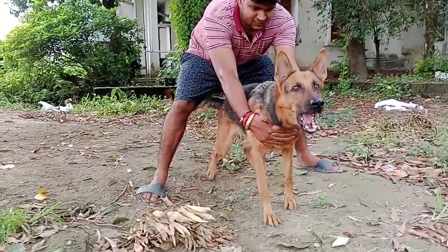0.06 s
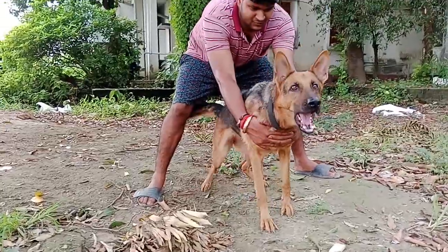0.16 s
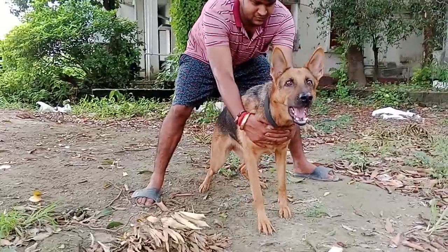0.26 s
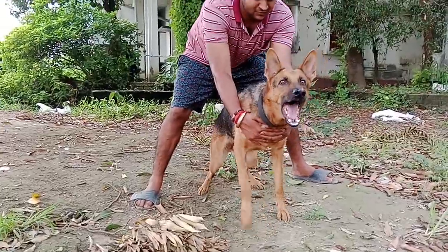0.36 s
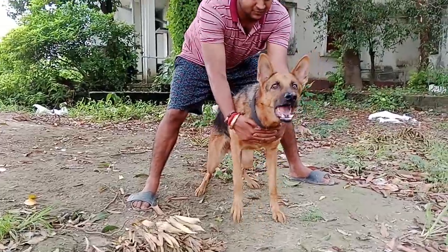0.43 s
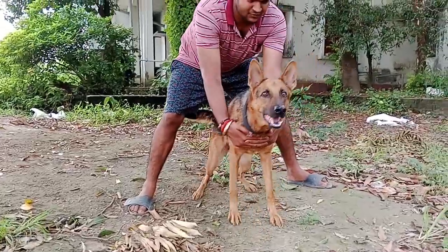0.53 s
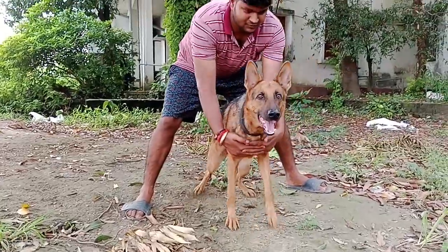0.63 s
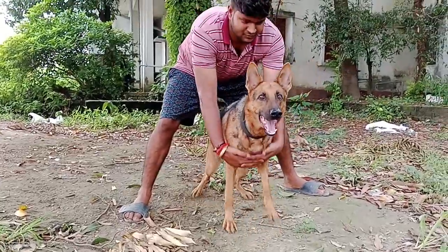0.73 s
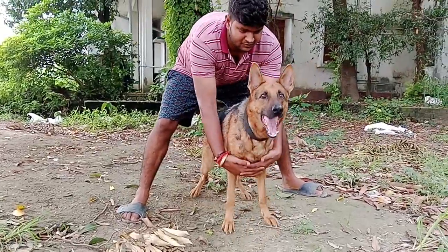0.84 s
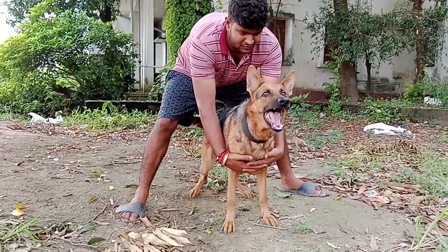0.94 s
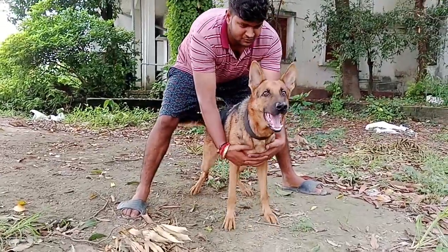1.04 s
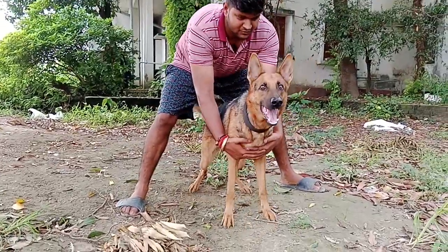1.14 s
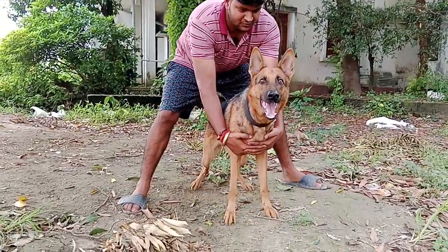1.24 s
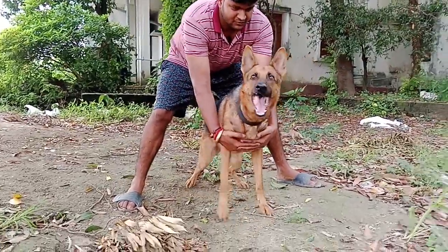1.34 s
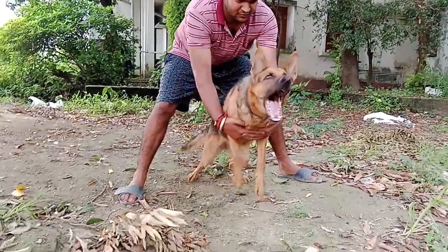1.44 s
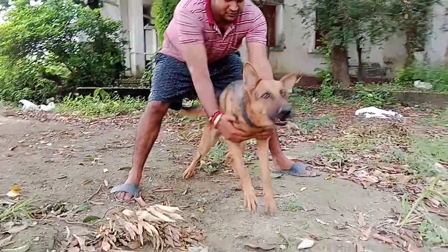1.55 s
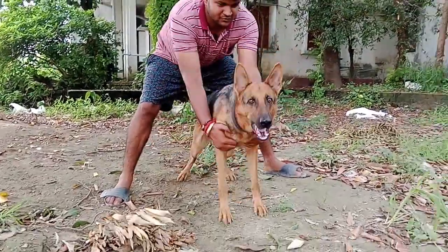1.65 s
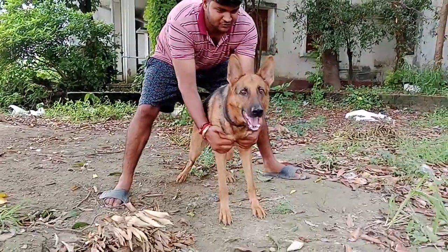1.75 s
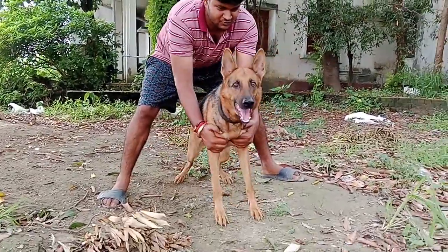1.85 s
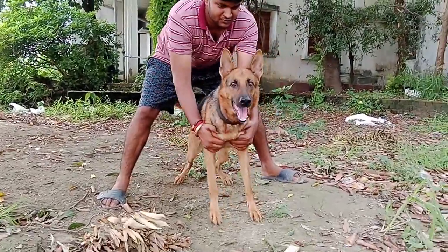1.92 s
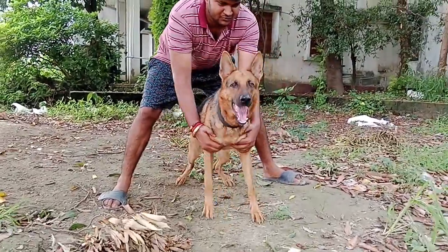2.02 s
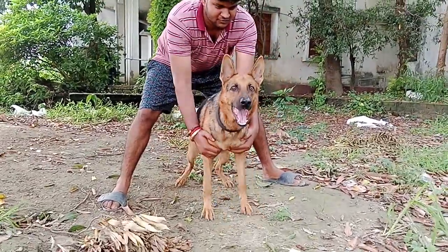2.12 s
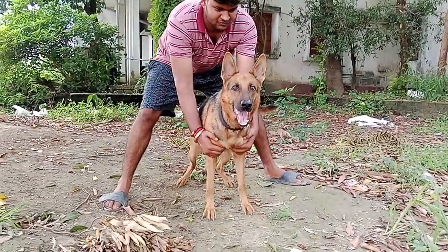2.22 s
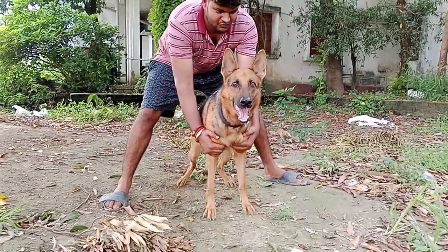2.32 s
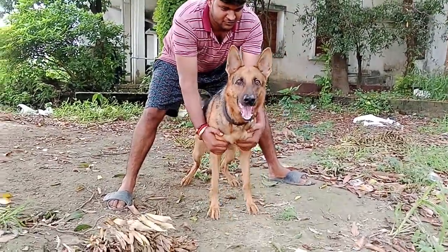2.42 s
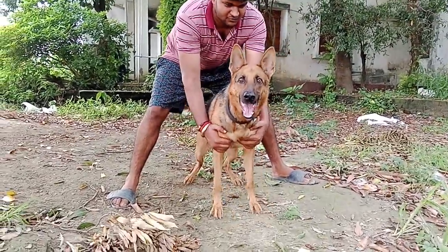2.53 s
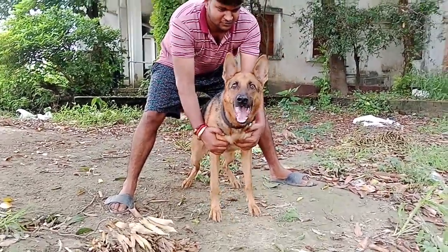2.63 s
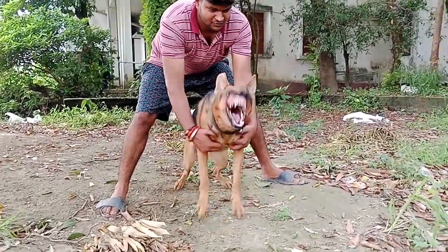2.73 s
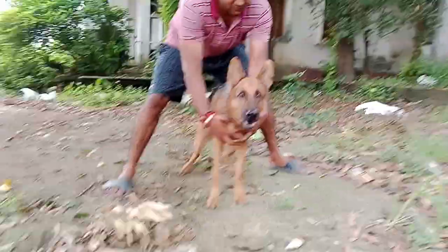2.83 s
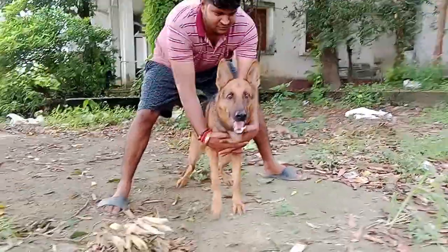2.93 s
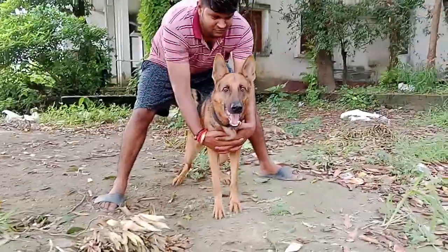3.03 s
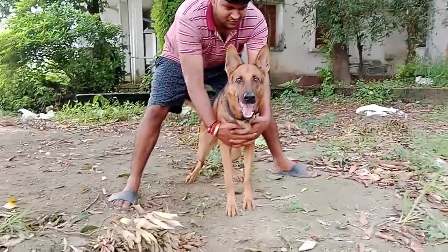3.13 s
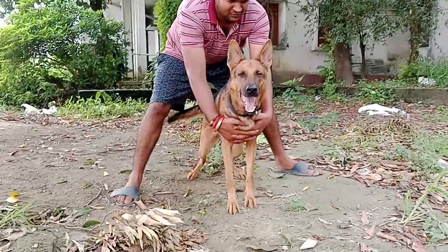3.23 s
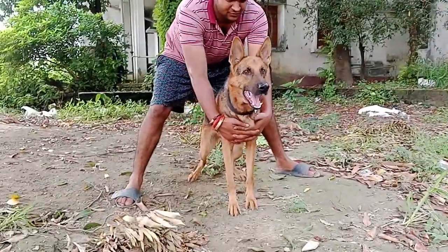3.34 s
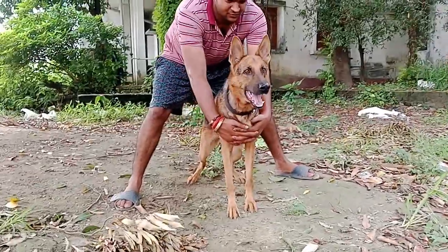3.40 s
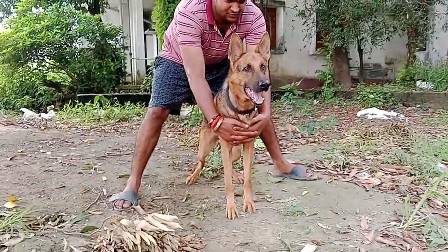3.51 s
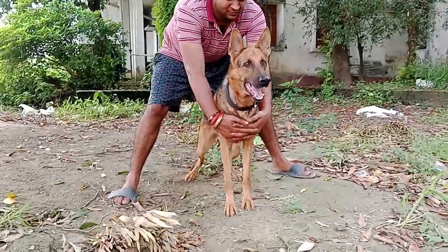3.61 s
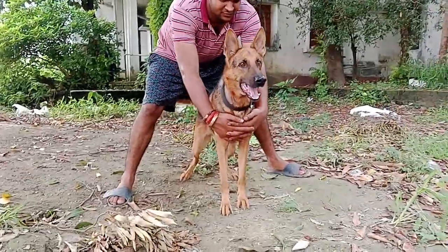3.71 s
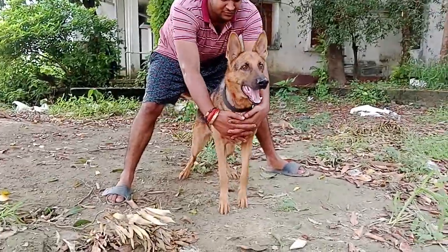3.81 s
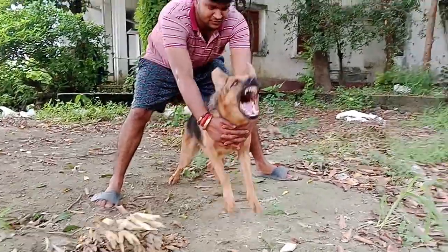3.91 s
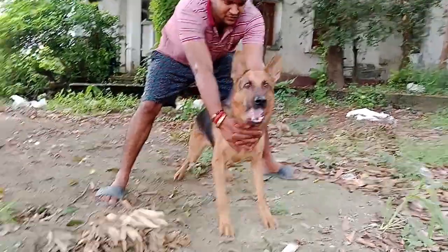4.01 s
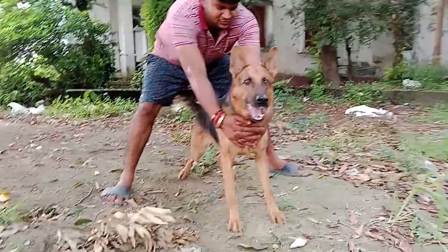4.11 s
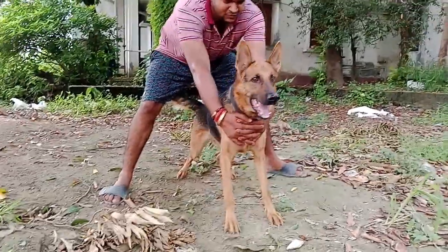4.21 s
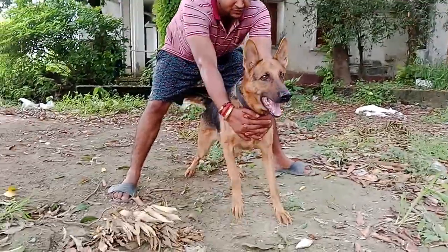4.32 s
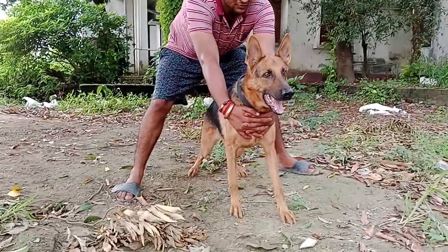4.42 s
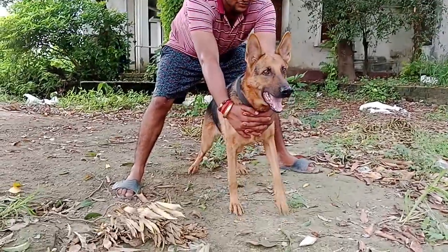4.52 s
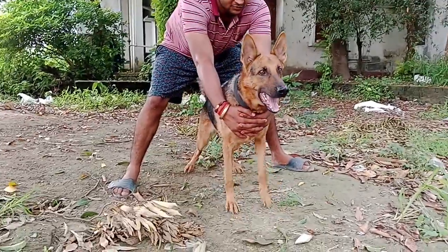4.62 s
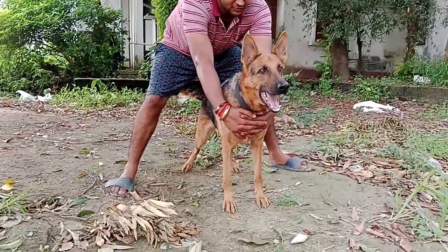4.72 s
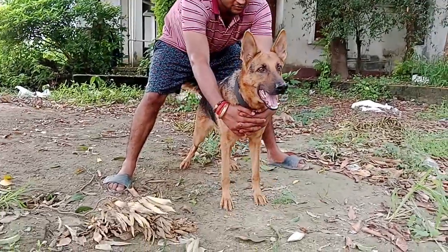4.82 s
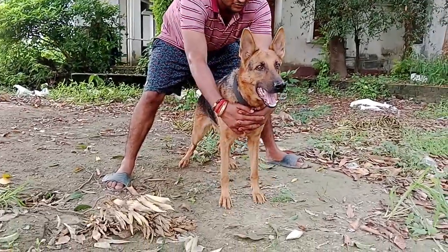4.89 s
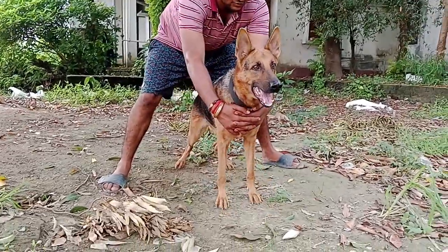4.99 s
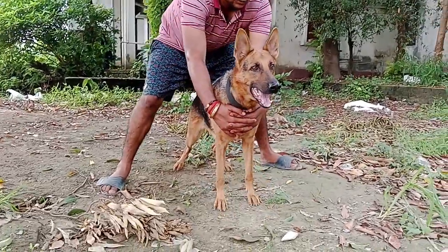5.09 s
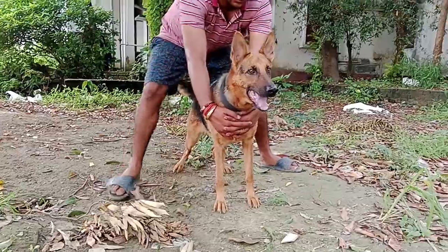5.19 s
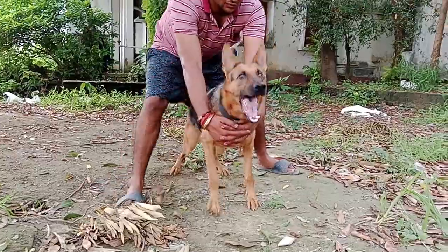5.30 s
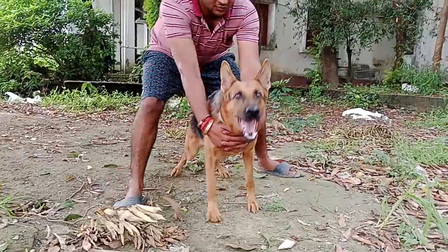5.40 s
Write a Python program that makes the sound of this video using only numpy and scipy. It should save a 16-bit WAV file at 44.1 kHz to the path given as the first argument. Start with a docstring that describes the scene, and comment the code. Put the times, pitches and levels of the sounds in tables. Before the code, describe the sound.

A large dog in an open yard near a wall, picked up fairly close in one channel. At 0 s the falling tail of a bark is cut in, turning at once into a tense, wavering whine that drops lower around 0.2 s, rises again and ends at 0.5 s with an airy gasp and thin nasal whistle. Eight short, high, tonal barks follow, each about a tenth of a second, at roughly 0.9, 1.5, 2.1, 2.7, 3.3, 3.9, 4.7 and 5.4 s. The one at 2.1 is lower and weaker; the last has no gasp. After the others comes a quick breathy gasp, usually with a small rising squeak, abruptly cut. A diffuse wall echo rings after each call, its level dropping suddenly and mostly sinking before the next. Faint panting and shuffling, around 1.9, 3.1, 4.4 and 5.3 s, and soft low thumps lie under a very quiet, noise-reduced background.

```python
"""In a yard near a wall, a large dog, held back, ends a bark, whines and then gives eight short high barks.
The voice stacks vocal-fold harmonics over rasp; a gasp of filtered noise follows the whine and all but
the last bark, mostly with a thin nasal whistle made of gliding sines. Wall echoes and random taps make
the yard ring. After each of these calls the level swells, drops quickly and mostly sinks until the next
call. Faint panting, low thumps and a noise floor lie below."""
import sys
import numpy as np
from scipy import signal
from scipy.fft import rfft, irfft, next_fast_len
from scipy.io import wavfile
from scipy.ndimage import uniform_filter1d, minimum_filter1d

SR = 44100
rng = np.random.default_rng(int(sys.argv[2]) if len(sys.argv) > 2 else 0)


def inscribe(sig):
    """Save sig as 16-bit PCM at rate SR to the path in sys.argv[1].

    A 1-D sig is mono; a 2-D sig holds one channel per row.
    Samples are clipped to [-1, 1] before scaling.
    """
    pcm = np.round(np.clip(np.atleast_2d(sig).T, -1, 1) * 32767)
    wavfile.write(sys.argv[1], SR, pcm.astype(np.int16))


N = 240413  # length in samples

# Colour of the noise floor. Each row: frequency in Hz, relative density in dB per Hz.
FLOOR_COLOUR = [(20, -32.5), (100, -15.5), (180, -4), (450, -15), (1000, -15.5), (3000, -24), (7000, -34),
                (15000, -39.5)]
FLOOR_DB = -77  # rms, ahead of the suppressor
# Soft low thumps. Each row: peak in seconds, rise in seconds, fall in seconds, level in dB, pitch in Hz.
THUMPS = [(.6, 0.048, 0.047, -44, 102), (1.165, 0.099, 0.037, -56, 130), (1.737, 0.04, 0.018, -49.5, 134),
          (2.231, 0.079, 0.035, -60.5, 155.3), (2.289, 0.044, 0.054, -53, 128.6),
          (2.912, 0.039, 0.042, -52, 142.1), (3.466, .07, 0.06, -49.5, 135), (4.162, 0.071, .03, -67, 156),
          (4.314, 0.078, 0.06, -75.5, 119), (4.97, 0.05, 0.07, -60, 133)]
THUMP_ENDS_DB, PANT_ENDS_DB = -27.5, -24.5  # start and end, relative to the peak
# Faint panting and shuffling. Each row: start in seconds, peak in seconds, end in seconds, level in dB.
PANTS = [(1.812, 1.855, 2.53, -58), (2.993, 3.059, 3.24, -57), (4.23, 4.398, 5.04, -59),
         (5.242, 5.28, 5.32, -59), (5.307, 5.335, 5.44, -45)]
# Colour of the panting. Each row: frequency in Hz, relative density in dB per Hz.
PANT_COLOUR = [(1200, -33), (2300, 10), (2750, 3.5), (3300, 9.5), (4200, -13.5), (6500, -9.5), (10000, -21.0)]
# Decay of the yard. Each row: frequency in Hz, time to fall by 60 dB in seconds.
YARD_DECAY = [(300, 0.78), (800, 0.76), (1600, 0.88), (3000, 0.64), (4500, 1), (12000, 1)]
# Single wall echoes. Each row: delay in seconds, level in dB.
WALL_ECHOES = [(.045, -29), (.088, -25.5), (.14, -26.5), (.26, -35)]
# Microphone tone on the dog and the yard. Each row: frequency in Hz, gain in dB.
MIC_TONE = [(100, -10), (250, -14), (400, -1), (3400, 0), (4000, -5), (4800, -14.5), (5400, -10.5),
            (6400, -10), (9000, -10), (15000, -9.5)]
# Level moves between one call and the next. Each row: swell start in seconds, step in seconds,
# return in seconds.
STEP_TIMES = [(.52, .618, .908), (1.015, 1.113, 1.496), (1.65, 1.742, 2.06), (2.16, 2.215, 2.712),
              (2.825, 2.961, 3.305), (3.4, 3.482, 3.912), (4.025, 4.161, 4.67), (4.787, 4.86, 5.345)]
# Sizes of those moves. Each row: swell in dB, step in dB, sink (negative falls) in dB per second.
STEP_LEVELS = [(3, -5.5, -5.5), (2.5, -3.5, -8.5), (5, -4, 10), (3, -2.5, -38.5), (4, -4.5, -4),
               (3, -8.5, -29), (7.5, -5, -0.5), (3, -6.5, -23)]
# Gasps, one in each swell. Each row: peak in seconds, air level in dB, hiss level in dB,
# start relative to the peak in dB, end relative to the peak in dB.
GASPS = [(.566, -30.5, -46, -15.5, -7), (1.095, -39, -50, -14, -5.5), (1.708, -30, -49.5, -16.5, -6.5),
         (2.2, -32, -44, -14, -7), (2.882, -46, -60.5, -9, -4.5), (3.427, -37.5, -50.5, -5.5, -16),
         (4.15, -39, -55.5, -8.5, -4.5), (4.835, -37.5, -45.5, -2.5, -1.5)]
GASP_OVERHANG_S = .006  # a gasp ends this long after its level step
# Rush of air in a gasp. Each row: frequency in Hz, relative density in dB per Hz.
AIR_COLOUR = [(250, -58), (500, -15), (800, -6.5), (1100, -4.5), (1600, -1.5), (2300, -9), (3000, -15.5),
              (3700, -18), (5000, -31.5), (8000, -52)]
# Hiss in a gasp. Each row: frequency in Hz, relative density in dB per Hz.
HISS_COLOUR = [(3000, -25), (5500, 1.5), (8000, 0.5), (11000, -10.5), (15500, -12)]
# Nasal whistles. Each row: start in seconds, length in seconds, start pitch in Hz, end pitch in Hz,
# lateness of the glide as an exponent, level in dB, overtones relative to the fundamental in dB.
WHISTLES = [(0.517, 0.098, 2982, 3170, 1.5, -29.5, -16), (1.014, .075, 3046, 3830, 7.2, -32, -12.5),
            (2.171, 0.046, 3153, 4700, 5, -28, -5), (2.83, 0.06, 2935, 3940, 2.57, -45, -3.5),
            (3.4, .042, 3030, 4170, 2.9, -34, -2.5), (4.031, 0.038, 2950, 3300, 1.8, -37.5, -9.5),
            (4.771, 0.029, 4010, 3036, 0.89, -39, -4.5), (4.795, .1, 3040, 4520, 2.1, -34, 0.5)]
WHISTLE_PEAK = .6  # loudest at this share of the length
WHISTLE_START_DB, WHISTLE_END_DB = -9, -17  # relative to the peak
# Vocal folds, one curve a syllable: the falling tail of an earlier bark, the whine in two pieces, then
# the barks. Each row: time in seconds, pitch in Hz, level in dB, brightness in dB per harmonic
# (up to the third), hoarseness in dB.
VOICE = [
    [(0.0, 713.7, -16, -6, -24), (0.02, 635.9, -29, -4.5, -5.5), (0.04, 511.8, -39.5, -3.5, -1.5)],
    [(0.04, 769.2, -26.5, -1.5, -23.5), (0.076, 788, -28, -2, -12), (0.092, 758.1, -19.5, 2.5, -8),
     (0.111, 773, -16, 1, -14.5), (0.135, 805.3, -14, 5, -19.5), (0.159, 793.8, -15.5, 0.5, -21),
     (0.183, 810.9, -11.5, 0.5, -13.5)],
    [(0.187, 544.8, -18, 2, -8.5), (0.205, 547.8, -18, 1.5, -23), (0.229, 522.6, -15.5, 4.5, -26.5),
     (0.255, 477.2, -25, 6.5, -15.5), (0.283, 500.3, -22, 5.5, -26.5), (0.313, 486.2, -24.5, 4.5, -24),
     (0.329, 501.6, -20.5, 7.5, -24), (0.342, 479, -21, 3.5, -8.5), (0.352, 504, -23, 2.5, -18),
     (0.365, 560.6, -14.5, 5.5, -22), (0.391, 626.4, -18, 0, -27), (0.41, 626.5, -15, 1, -30.5),
     (0.439, 617.4, -19, 0.5, -28.5), (0.465, 584.7, -21, -1.5, -23.5), (0.5, 522.2, -20.5, 3, -18.5),
     (0.52, 495.1, -37, -0.5, -16)],
    [(0.915, 536.5, -66, 3, -7.5), (0.923, 571.8, -31.5, 0, -2), (0.933, 641, -21, 8, -20.5),
     (0.944, 814.7, -11.5, 2.5, -34), (0.965, 877, -10.5, -2, -33), (0.988, 980, -7, -2, -29),
     (1.002, 955.3, -12.5, -1, -30.5), (1.015, 836, -36.5, 0.5, -11)],
    [(1.503, 583.2, -64, 9, 3), (1.516, 605.8, -23.5, -5, -6), (1.53, 761.8, -12.5, 5, -35.5),
     (1.543, 814.6, -14.5, -6, -28.5), (1.57, 765.3, -10, -3.5, -29.5), (1.582, 770, -10, -2, -27.5),
     (1.59, 849, -20, -3.5, -5.5), (1.604, 834.6, -18.5, -3, -14), (1.62, 749.6, -17.5, -4, -31),
     (1.638, 668.6, -22, -4, -19), (1.655, 686, -30.5, -5.5, -3)],
    [(2.068, 504.7, -61.5, -3, -8.5), (2.075, 557.3, -30, 1, -2), (2.085, 557.6, -22.5, 0, -2),
     (2.096, 613.3, -19.5, 6, -14.5), (2.11, 668.3, -27, 0, -31), (2.121, 800, -12, -0.5, -19.5),
     (2.134, 755.3, -15, 3, -40.5), (2.149, 646, -21, 0.5, -13), (2.162, 545, -48, -2, -5)],
    [(2.72, 640.6, -58.5, 6.5, 3), (2.729, 645.5, -20.5, 0, -9), (2.742, 801.5, -14, 0.5, -46.5),
     (2.757, 832.6, -13.5, -1.5, -29), (2.773, 789, -10.5, 0.5, -34.5), (2.79, 793.6, -10.5, 1, -30),
     (2.81, 811.8, -13, -10.5, -43.5), (2.827, 745.6, -29.5, -1, -18.5)],
    [(3.313, 544.7, -61, 2.5, -7), (3.321, 540, -36.5, -0.5, -6), (3.332, 658.6, -19.5, 4, -12),
     (3.343, 808.3, -13.5, -1, -35), (3.357, 883.3, -16.5, -4, -34.5), (3.371, 890.2, -4.5, -1.5, -30),
     (3.386, 771.5, -16.5, 2.5, -42), (3.4, 649, -43, 1.5, -2)],
    [(3.92, 570.2, -63.5, 2.5, 0.5), (3.929, 636.2, -22.5, -4.5, -19.5), (3.942, 746.7, -14.5, 6, -30),
     (3.956, 822.6, -13.5, 1.5, -46.5), (3.972, 834.5, -10.5, 0, -22), (3.99, 831.7, -7, -4.5, -32.5),
     (4.007, 797, -10, 1, -48.5), (4.025, 702, -31, 4.5, -17)],
    [(4.678, 455.5, -62.5, -2.5, -5.5), (4.686, 518.6, -37, 3, -7.5), (4.695, 500.5, -24, -0.5, -14.5),
     (4.708, 611.5, -28.5, 0.5, -10.5), (4.718, 706, -16, 4.5, -28.5), (4.73, 863.4, -8.5, 1, -29),
     (4.744, 885.3, -11.5, -3, -22), (4.758, 870.7, -6, -1, -28), (4.773, 809.6, -13, 1.5, -31),
     (4.787, 694.4, -26.5, 11.5, -17)],
    [(5.354, 647, -63, 4.5, 3), (5.362, 649.5, -21, 0, -14), (5.373, 768, -7.5, 5, -36),
     (5.387, 864, -13, -2, -26), (5.41, 872, -7, -1.5, -45.5), (5.432, 882.5, -9.5, 1.5, -35),
     (5.452, 839, -25, 1, -20)],
]
# The mouth through the calls. Each row: time in seconds, level of the higher harmonics in dB,
# level of the second harmonic in dB, opening as a factor on the throat resonances.
MOUTH = [
    [(0.0, -48.5, -32, 0.78), (0.01, -66, -33, 0.95), (0.06, -66, -34.5, 0.98), (0.104, -60, -24.5, 1.01),
     (0.142, -53, -18.5, 0.94), (0.168, -60.5, -20.5, 1.01), (0.185, -58, -23.5, 0.92)],
    [(0.187, -59.5, -28, 0.95), (0.229, -58.5, -25, 1.12), (0.259, -61, -39, 1.18),
     (0.291, -63, -28.5, 1.3), (0.309, -61.5, -32.5, 2), (0.339, -55, -26, 1.01), (0.35, -57, -28.5, 0.88)],
    [(0.352, -57.5, -27.5, 1.01), (0.364, -50, -33.5, 1.07), (0.41, -51, -18.5, 0.93),
     (0.438, -52.5, -30.5, 0.99), (0.454, -55.5, -19.5, 1.02), (0.474, -51, -26, 1.01),
     (0.52, -65.5, -33.5, 0.94)],
    [(0.915, -67, -60.5, 0.9), (0.921, -61, -42, 0.92), (0.939, -55, -15.5, 1), (0.985, -45.5, -31, 1),
     (1.005, -49.5, -22.5, 1.22), (1.015, -56.5, -49, 0.72)],
    [(1.503, -70, -62.5, 0.8), (1.513, -59, -36, 1.07), (1.531, -56, -15, 0.9), (1.571, -56, -17.5, 1.085),
     (1.639, -64.5, -42, 0.96), (1.655, -69.5, -26, 1.01)],
    [(2.068, -65, -61, 1.1), (2.074, -59.5, -26, 1.12), (2.096, -57.5, -24.5, 0.96),
     (2.106, -56, -26.5, 1.08), (2.114, -57.5, -17, 1.01), (2.13, -53.5, -11, 1.09),
     (2.162, -60.5, -40, 0.93)],
    [(2.72, -66, -48.5, 0.84), (2.734, -58.5, -17, 1.034), (2.782, -47, -17.5, 0.96),
     (2.802, -55, -18, 1.22), (2.827, -64, -40.5, 1.15)],
    [(3.313, -66, -56.5, 0.96), (3.321, -50, -35, 0.78), (3.339, -58, -18, 0.89), (3.359, -53, -32.5, 1.12),
     (3.373, -57, -16, 1.005), (3.383, -56, -13.5, 0.97), (3.4, -57, -34.5, 1.1)],
    [(3.92, -70.5, -63, 1.12), (3.924, -66, -44.5, 1.07), (3.936, -57.5, -18.5, 0.98),
     (3.95, -51.5, -17, 0.93), (3.962, -57.5, -15.5, 1.01), (3.982, -51, -20, 0.96),
     (4.006, -51.5, -15.5, 0.97), (4.025, -66.5, -34.5, 0.81)],
    [(4.678, -67.5, -64.5, 1.01), (4.684, -54.5, -35, 0.91), (4.698, -56, -33, 1.01),
     (4.708, -56, -28.5, 0.97), (4.72, -56.5, -15, 0.88), (4.732, -55, -23.5, 1.04),
     (4.772, -56, -14.5, 0.98), (4.787, -50, -31.5, 0.96)],
    [(5.354, -70, -55, 1.05), (5.36, -59, -33.5, 0.9), (5.372, -57.5, -6.5, 1.055), (5.4, -47, -26.5, 0.97),
     (5.414, -48, -18, 1.02), (5.43, -45, -21, 1.06), (5.451, -54, -27, 0.85)],
]
# How throat and mouth weigh the four lowest harmonics. Each row: frequency in Hz, weight in dB.
THROAT = [(450, 0), (600, -11.5), (800, 0.5), (950, -3), (1150, -11), (1600, -6), (2000, -12), (2350, -9),
          (2650, -23.5), (3200, -42), (3800, -23.5)]
# Tone of the harmonics from the fifth up. Each row: frequency in Hz, gain in dB.
UPPER_TONE = [(2400, 15), (3300, 2.5), (4200, -3), (4800, -9), (5400, -1), (6500, 3.5), (9000, -9),
              (12000, -11), (16000, -16)]
# Colour of the rasp. Each row: frequency in Hz, relative density in dB per Hz.
RASP_COLOUR = [(300, -56), (550, -25.5), (900, 0.5), (1500, 4.5), (2400, -1), (3200, -13.5), (4500, -24),
               (7000, -20.5), (10000, -29.5), (15500, -28.5)]
RASP_DB = -6.5  # relative to level plus hoarseness
JITTER = 0.091  # pitch scatter of a fully hoarse voice, as a share of the pitch
# Threshold of the noise suppressor. Each row: frequency in Hz, level in dB.
GATE = [(100, -99), (400, -88.5), (3000, -82), (6000, -93), (15000, -101.5)]
EDGE_HZ = 15800  # top of the band


def amp(db):
    """Turns dB into gain."""
    return 10 ** (np.asarray(db) / 20)


def evened(x):
    """Scales to rms 1."""
    return x / np.sqrt(np.mean(x ** 2) + 1e-20)


def read(points, hz):
    """Reads a spectrum at hz, along a log frequency axis."""
    f, value = np.transpose(points)
    return np.interp(np.log(hz + 1), np.log(f + 1), value)


def coloured(x, points):
    """Filters by a spectrum of (Hz, dB) points."""
    size = next_fast_len(len(x) + 4096)
    gain = amp(read(points, np.fft.rfftfreq(size, 1 / SR)))
    return irfft(rfft(x, size) * gain, size)[:len(x)]


def wobble(size, width=150):
    """Slow random drift of rms 1: noise averaged twice over width samples."""
    noise = rng.standard_normal(size)
    return evened(uniform_filter1d(uniform_filter1d(noise, int(width)), int(width)))


def played(curves, sound, fade=.006):
    """Sums sound(where, *columns) over the curves, with soft ends lasting fade seconds."""
    out = np.zeros(N)
    for rows in curves:
        s, *columns = np.transpose(rows)
        where = np.arange(round(s[0] * SR), min(round(s[-1] * SR), N))
        t = where / SR
        ends = np.minimum(t - s[0], s[-1] - t) / fade
        # no fade at the very start or end of the scene
        ends += (s[0] <= 0) * (t < .02) + (s[-1] > 5.4) * (t > 5.4)
        out[where] += np.clip(ends, 0, 1) * sound(where, *(np.interp(t, s, c) for c in columns))
    return out


def peaked(start, peak, end, db, start_db, end_db, *steady):
    """A level curve up to a peak and down again, with columns that hold still."""
    return [(start, db + start_db, *steady), (peak, db, *steady), (end, db + end_db, *steady)]


def noise_floor():
    """Steady noise, coloured towards the lows."""
    return amp(FLOOR_DB) * evened(coloured(rng.standard_normal(N), FLOOR_COLOUR))


def thumps():
    """Short low sine hums with an unsteady level."""
    flutter = 1 + .3 * wobble(N, 400)

    def hum(where, db, hz):
        return amp(db) * np.sqrt(2) * flutter[where] * np.sin(2 * np.pi * np.cumsum(hz) / SR)
    curves = [peaked(s - rise, s, s + fall, db, THUMP_ENDS_DB, THUMP_ENDS_DB, hz)
              for s, rise, fall, db, hz in THUMPS]
    return played(curves, hum, fade=0.011)


def breath(curves, colour, fade=.02):
    """Turbulent air: coloured noise that flutters along level curves."""
    air = evened(coloured(rng.standard_normal(N), colour)) * amp(1.3 * wobble(N, 300))
    return played(curves, lambda where, db: amp(db) * air[where], fade=fade)


def pants():
    """Faint breaths and shuffles, each noise rising to a peak and sinking."""
    return breath([peaked(*row, PANT_ENDS_DB, PANT_ENDS_DB) for row in PANTS], PANT_COLOUR)


def yard(x, tail_db=-13):
    """A few wall echoes and sparse random taps, each band dying at its own speed."""
    taps = np.zeros(SR)
    at = np.arange(500, SR - 20, 20)
    taps[at + rng.integers(0, 20, len(at))] = rng.choice([-1., 1.], len(at))
    hz, t, z = signal.stft(taps, SR, nperseg=256)
    decay = amp(-60 * t / read(YARD_DECAY, hz)[:, None])
    build_up = np.clip(t / 0.054, 0, 1)
    tail = signal.istft(z * decay * build_up, SR, nperseg=256)[1]
    tail *= amp(tail_db) / np.linalg.norm(tail)
    # uneven walls scatter each echo into a short burst
    smear = rng.standard_normal((len(WALL_ECHOES), 200)) * np.exp(-np.arange(200) / 50)
    for (s, db), echo in zip(WALL_ECHOES, smear):
        tail[round(s * SR):][:200] += amp(db) * echo / np.linalg.norm(echo)
    return signal.fftconvolve(x, tail)[:N]


def steps():
    """Gain that swells, drops quickly, drifts on (mostly sinking) and comes back."""
    t, db = np.arange(N) / SR, np.zeros(N)
    for (start, s, back), (swell_db, step_db, sink_db) in zip(STEP_TIMES, STEP_LEVELS):
        db += ((t > start) & (t < back)) * swell_db * np.minimum((t - start) / (s - start), 1)
        db += ((t > s) & (t < back)) * (step_db + sink_db * (t - s))
    return uniform_filter1d(amp(db), size=150)


def gasp(colour, column):
    """Air that swells, sags and is cut short; column 0 takes the air levels, 1 the hiss levels."""
    curves = [peaked(start, peak, cut + GASP_OVERHANG_S, (air_db, hiss_db)[column], *ends_db)
              for (start, cut, _), (peak, air_db, hiss_db, *ends_db) in zip(STEP_TIMES, GASPS)]
    return breath(curves, colour, fade=.012)


def whistles():
    """Wavering nasal tones: a gliding sine with three overtones."""
    drift, flutter = wobble(N, 100), wobble(N, 130)

    def tone(where, hz, db, over_db):
        turn = 2 * np.pi * np.cumsum(hz * (1 + 0.0041 * drift[where])) / SR
        overtones = np.sin(2 * turn) + 0.042 * np.sin(3 * turn)
        overtones += .05 * np.sin(4 * turn) * (4 * hz < EDGE_HZ)
        level = np.sqrt(2) * amp(db + 4.5 * flutter[where])
        return level * (np.sin(turn) + amp(over_db) * overtones)
    u = np.linspace(0, 1, num=17)  # share of the length
    swell_db = np.interp(u, [0, WHISTLE_PEAK, 1], [WHISTLE_START_DB, 0, WHISTLE_END_DB])
    glides = [np.transpose([s + length * u, a_hz + (b_hz - a_hz) * u ** late, db + swell_db, over_db + 0 * u])
              for s, length, a_hz, b_hz, late, db, over_db in WHISTLES]
    return played(glides, tone, fade=0.0015)


def voice():
    """Vocal-fold harmonics, the upper ones shaking more, plus rasp puffed once a cycle."""
    s, *columns = np.concatenate(VOICE).T
    spans = played(VOICE, lambda where, *columns: np.ones(len(where)), fade=1e-6)
    sounding = np.clip(2 * uniform_filter1d(spans, size=400), 0, 1)  # soft ends, short breaks bridged
    where = np.flatnonzero(sounding > 1e-6)
    t = where / SR
    hz, level_db, bright_db, hoarse_db = (uniform_filter1d(np.interp(t, s, c), 160) for c in columns)
    at, *mouth = np.concatenate(MOUTH).T
    upper_db, second_db, opening = (np.interp(t, at, c) for c in mouth)

    scatter = JITTER * amp(np.minimum(hoarse_db, 0)) * wobble(N, 30)[where]
    drift = 0.0015 * wobble(N, 400)[where]
    turns = np.cumsum(hz * (1 + drift + scatter)) / SR

    k = np.arange(1, 33)[:, None]  # harmonic numbers
    low = k[:4]
    shape_db = read(THROAT, low * hz / opening) + bright_db * np.minimum(low - 1, 2)
    # the four share the level by power, then the second takes its own
    low_db = level_db + shape_db - 10 * np.log10((amp(shape_db) ** 2).sum(0))
    low_db = np.where(low == 2, second_db, low_db)
    whole_db = np.concatenate([low_db, upper_db + read(UPPER_TONE, k[4:] * hz)])
    # strong and weak cycles in turn put lines half-way between the harmonics; the lowest radiates poorly
    below_db = np.concatenate([whole_db[:1] - 23.5, whole_db[:-1]])
    between_db = (whole_db + below_db) / 2 + np.minimum(hoarse_db, 0)

    shakes = np.array([wobble(len(where), 65) for _ in range(8)])
    shake = shakes[k[:, 0] % 8] * np.clip((k * hz - 3000) / 6000, 0, 1.1)  # phase, in radians
    patches_db = np.array([wobble(len(where), 490) for _ in k])
    patches_db *= np.clip(1.8 * (k - 2), 0, 5.0)  # lines come and go
    tone = np.zeros(N)
    for order, db in ((k, whole_db), (k - .5, between_db)):
        gains = amp(db + patches_db) * np.clip((EDGE_HZ - order * hz) / 500, 0, 1)
        phase = 2 * np.pi * order * turns - 0.36 * order ** 2 + shake
        tone[where] += (gains * np.cos(phase)).sum(0)

    rasp = evened(coloured(rng.standard_normal(N), RASP_COLOUR))[where]
    puffs = 1 + .5 * np.cos(2 * np.pi * turns)
    tone[where] += amp(level_db + hoarse_db + RASP_DB) * puffs * rasp
    return np.sqrt(2) * tone * sounding


def scene():
    """Mixes dog, yard, small sounds and floor into one channel."""
    barks = voice()
    gasps = whistles() + gasp(AIR_COLOUR, column=0) + gasp(HISS_COLOUR, column=1)
    echoes = yard(barks + amp(-2) * gasps)
    near = coloured(barks + gasps + echoes, MIC_TONE) * steps()
    return (near + pants() + thumps() + noise_floor())[None]


def suppressed(x, depth_db=-15):
    """A noise suppressor lowers every band whose smoothed power is near or below the threshold."""
    hz, _, z = signal.stft(x, SR, nperseg=512, noverlap=384)
    power = uniform_filter1d(uniform_filter1d(abs(z) ** 2, size=5, axis=-1), size=2, axis=-2)
    threshold = amp(read(GATE, hz)[:, None]) ** 2
    keep = np.maximum(power / (power + threshold), amp(depth_db))
    return signal.istft(z * keep, nperseg=512, noverlap=384)[1][:, :N]


def record(dry):
    """Noise suppressor, a limiter that holds the peaks, then the band limit."""
    clean = suppressed(dry)
    peak = -minimum_filter1d(-abs(clean), 600, axis=1)
    gain = np.minimum(1, 0.65 / (peak + 1e-9))
    held = clean * uniform_filter1d(uniform_filter1d(gain, 300, axis=1), 300, axis=1)
    low_pass = signal.firwin(511, EDGE_HZ, window=("kaiser", 9), fs=SR)
    return signal.oaconvolve(held, low_pass[None], "same")


dry = scene()
out = record(dry)
inscribe(out)
```